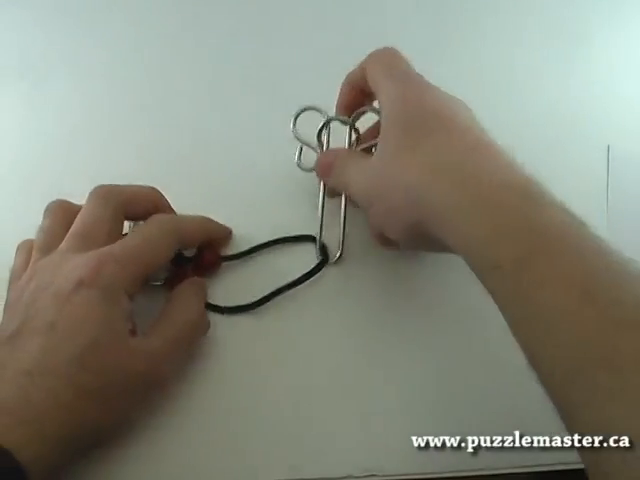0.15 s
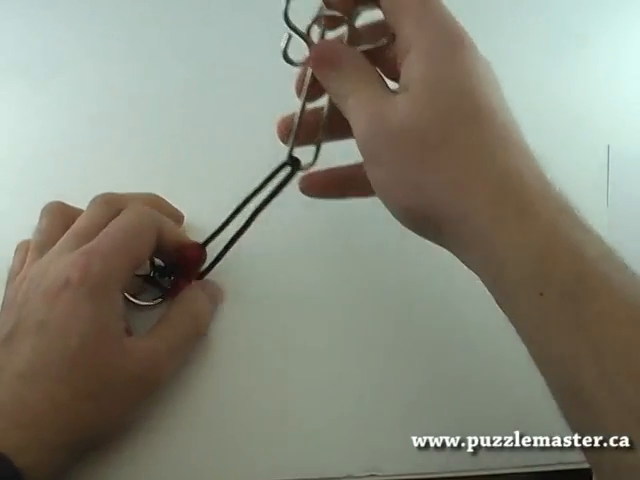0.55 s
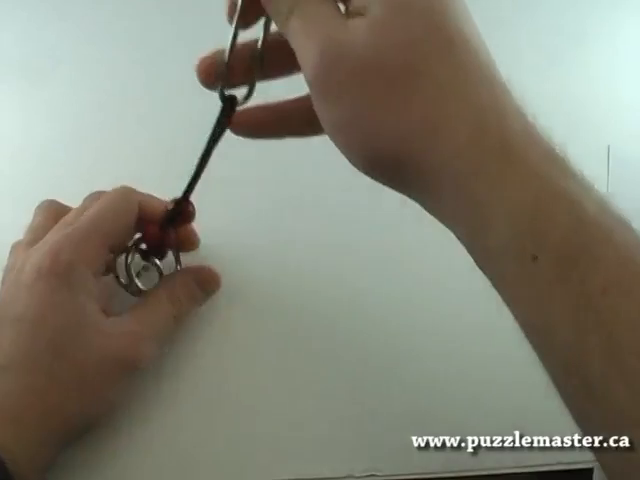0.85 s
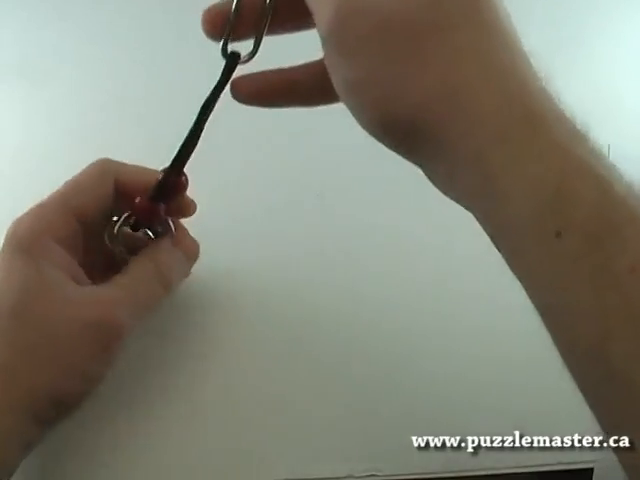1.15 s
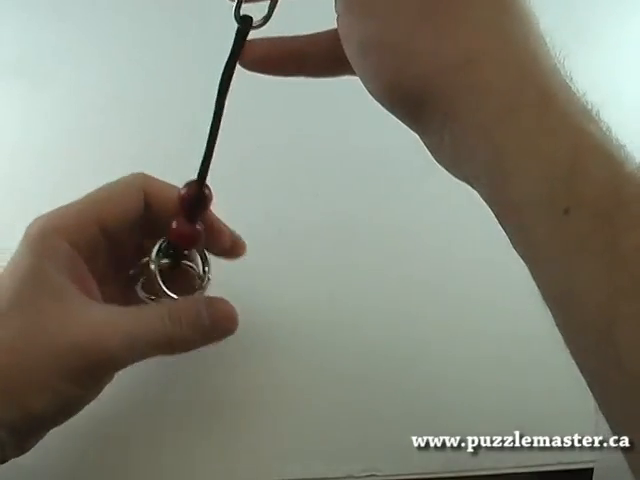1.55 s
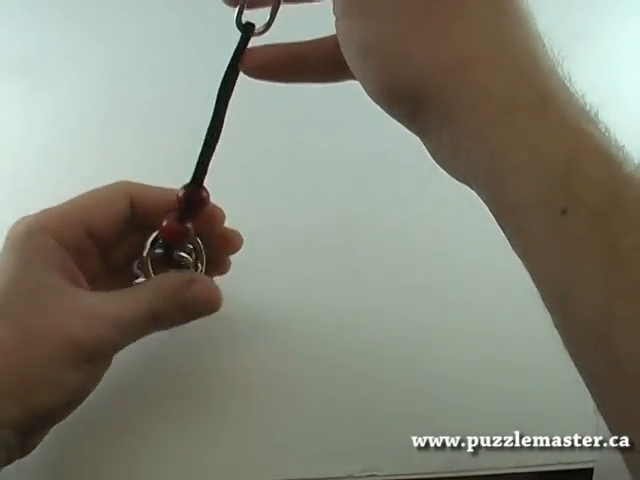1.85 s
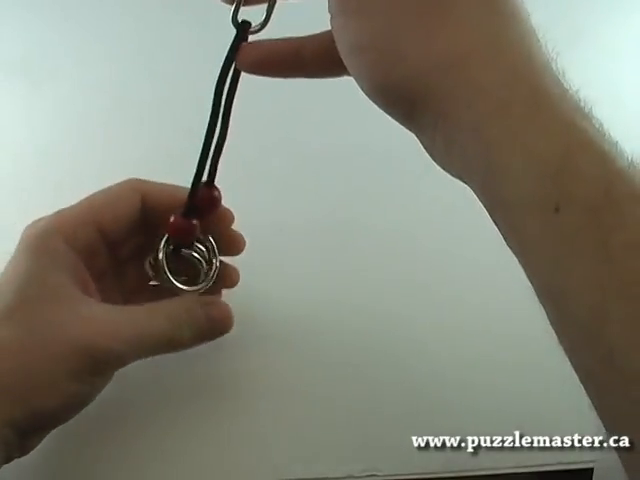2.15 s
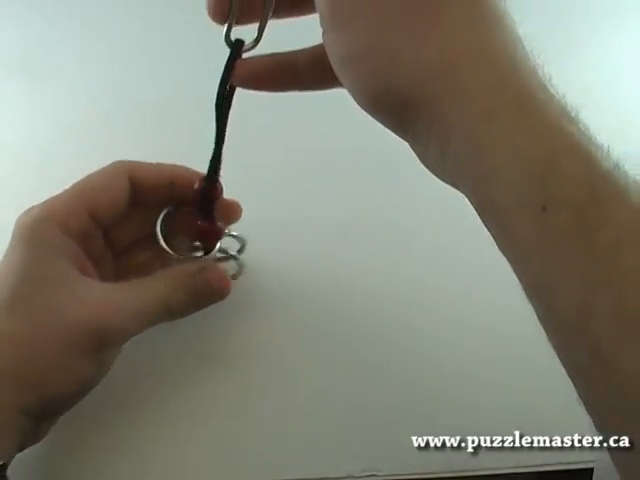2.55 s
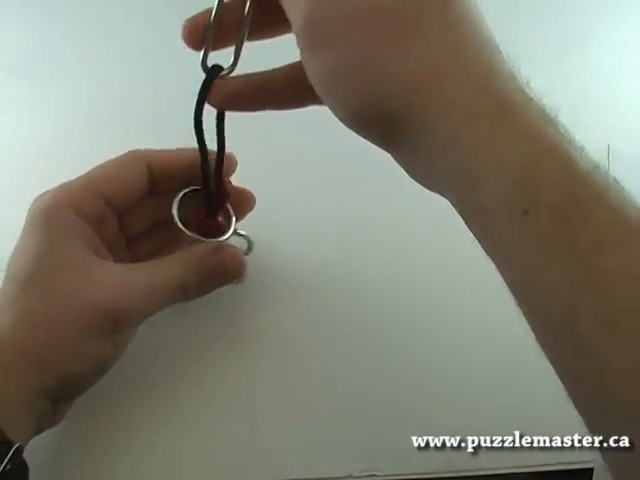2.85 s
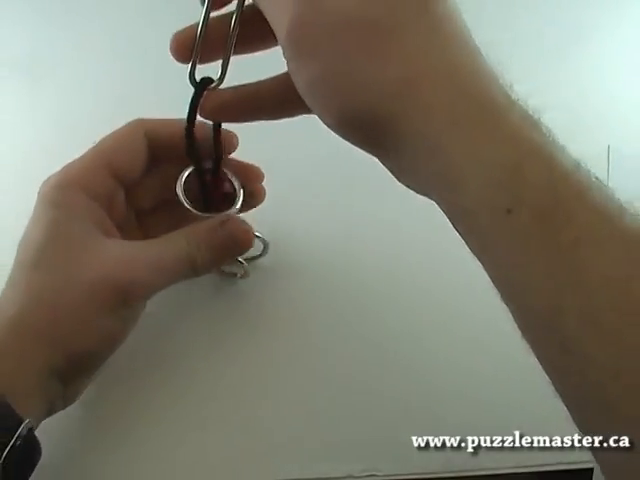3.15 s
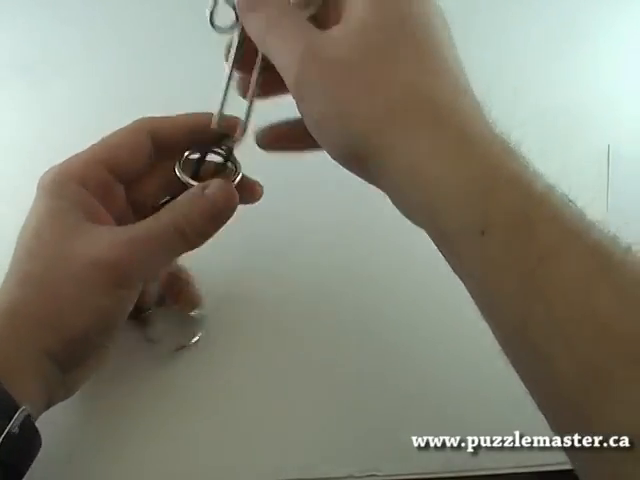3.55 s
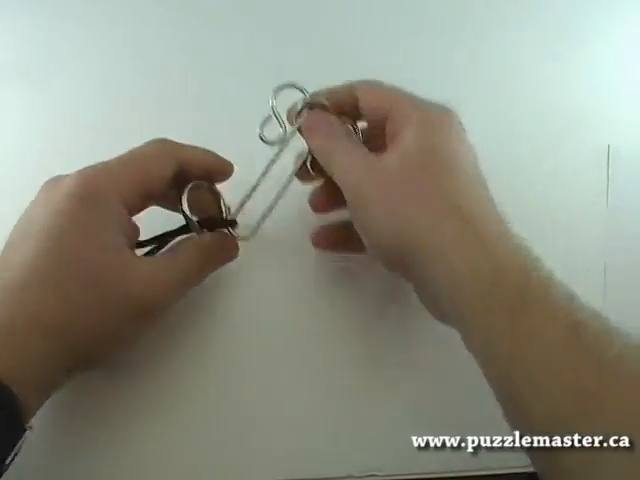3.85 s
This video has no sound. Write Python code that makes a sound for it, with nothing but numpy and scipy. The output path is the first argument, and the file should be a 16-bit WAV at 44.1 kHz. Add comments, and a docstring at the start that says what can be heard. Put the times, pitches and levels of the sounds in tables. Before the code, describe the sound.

Thin steel rings and a bent wire frame jingle, with sharp wooden bead clicks, close up indoors

```python
"""Wire puzzle lifted off a table

Hands lift a wire puzzle in a quiet room. Steel rings clink and a bent wire frame rattles: decaying modes plus
a noisy crack. Wooden beads click on their cord: struck resonances. Wire scrapes as random grains; cord and
fingers rub as shaped hiss; the table top rumbles under dragged parts as resonant noise. Mains gear hums as
steady tones over room tone, and a short room tail answers the hits."""
import sys
import numpy as np
from scipy import signal
from scipy.fft import rfft, irfft, next_fast_len
from scipy.io import wavfile
from scipy.ndimage import map_coordinates

SR = 44100
rng = np.random.default_rng(int(sys.argv[2]) if len(sys.argv) > 2 else 0)


def unload_audio(sound):
    """Save the sound as a 16-bit wav file, at the path given as the first command line argument."""
    columns = np.transpose(np.atleast_2d(sound))
    # keep every value between -1 and 1, then stretch to whole-number steps
    steps = np.round(np.clip(columns, -1, 1) * 32767)
    wavfile.write(sys.argv[1], SR, steps.astype(np.int16))


N = 176400


def amp(db):
    """Decibels to amplitude factor."""
    return 10 ** (np.asarray(db) / 20)


def unit(x):
    """Scale to rms 1."""
    return x / np.sqrt(np.mean(x ** 2) + 1e-20)


def along(points, hz):
    """Interpolate (Hz, value) points on a log frequency axis."""
    point_hz, value = np.transpose(points)
    return np.interp(np.log(hz + 1), np.log(point_hz + 1), value)


def curves(rows):
    """One value per sample for each column after the time."""
    s, *columns = np.transpose(rows)
    return [np.interp(np.arange(N) / SR, s, column) for column in columns]


def wobble(rate_hz):
    """Smooth random curve, rate_hz knots a second."""
    knots = rng.standard_normal(int(N * rate_hz / SR) + 4)
    return map_coordinates(knots, [np.arange(N) * rate_hz / SR])


def filtered(x, response):
    """Apply a complex frequency response to x."""
    size = next_fast_len(x.shape[-1] + 4096)
    spectrum = rfft(x, size) * response(np.fft.rfftfreq(size, 1 / SR))
    return irfft(spectrum, size)[..., :x.shape[-1]]


def resonances(rows):
    """Response of (Hz, width Hz, dB) resonances summed with alternating sign."""
    def response(f):
        total = 0
        for k, (centre, width, db) in enumerate(rows):
            band = 1j * f * width / (centre * centre - f * f + 1j * f * width)
            total = total + (-1) ** k * amp(db) * band
        return total
    return response


def stereo_noise(gain):
    """Coloured noise of rms 1, mixed from mid and side for a likeness that varies with frequency."""
    # left-right likeness: hz, correlation
    likeness = [(60, 0.76), (1000, 0.49), (4000, 0.72), (15000, 0.11)]

    def mid_side_gain(hz):
        turn = np.arccos(np.clip(along(likeness, hz), -1, 1)) / 2
        return gain(hz) * np.array([np.cos(turn), np.sin(turn)])

    mid, side = filtered(rng.standard_normal((2, N)), mid_side_gain)
    return unit(np.array([mid + side, mid - side]))


def add(out, start_s, peak_db, sound):
    """Lay in a stereo sound, its mono mix scaled to the given peak."""
    at = max(round(start_s * SR), 0)
    out[:, at:at + sound.shape[1]] += amp(peak_db) * sound / np.abs(sound.mean(0)).max()


def room_tone():
    """Steady coloured noise of the quiet room."""
    # room tone colour: hz, density_db (per Hz, relative)
    colour = [(20, -23), (40, -19.5), (90, -14), (200, -18), (420, -20), (900, -19), (2300, -27),
              (3200, -31), (7000, -35.5), (12000, -54), (16000, -38.5)]
    rms_db = -65
    return amp(rms_db) * stereo_noise(lambda hz: amp(along(colour, hz)))


def hum():
    """Mains tones of slowly wavering level; the two lowest beat."""
    # hum tones: pitch_hz, level_db (before trim)
    tones = [(114.6, -69.5), (120, -71), (240, -71.5), (2250, -79)]
    in_phase_s, trim_db = 2.77, 1.5
    t = np.arange(N) / SR - in_phase_s
    out = 0
    for hz, db in tones:
        out = out + amp(db + trim_db + 1.06 * wobble(3.7)) * np.cos(2 * np.pi * hz * t)
    return out


def rubbing():
    """Cord and fingers rub: grainy hiss with fast level flicker."""
    # rub strength: time_s, level_db (before trim)
    strength = [(0, -56), (.3, -57.5), (.5, -61), (.78, -66), (1.045, -68.5), (1.056, -59), (1.09, -65.5),
                (1.14, -57.5), (1.19, -58), (1.245, -50), (1.275, -69), (2.2, -72), (3.5, -68.5),
                (3.55, -80), (3.64, -60), (3.7, -60), (3.8, -55), (4, -66.5)]
    # rub colour: hz, density_db (per Hz, relative)
    colour = [(2500, -5.5), (3500, -10.5), (5200, -1.5), (7000, -1.5), (9000, -2), (11500, -2.5),
              (14000, -9.5), (16000, -16)]
    low_cut_hz, trim_db = 2500, 1.5
    db, = curves(strength)
    level = amp(db + trim_db + 0.5 * wobble(37) + wobble(300))
    return level * stereo_noise(lambda hz: amp(along(colour, hz)) * (hz > low_cut_hz))


def table_noise(modes):
    """Noise in the table's resonances, almost alike left and right."""
    pair = stereo_noise(lambda f: np.abs(resonances(modes)(f)) ** 2)
    return 0.78 * pair.mean(0) + 0.098 * pair


def dragging():
    """Lumpy dragging and decaying bumps drive noise in the table top's resonances."""
    # dragged parts: time_s, low_level_db, upper_level_db (before lumps)
    drag = [(0, -65.5, -53), (.3, -60, -60), (.75, -62, -73), (.94, -72, -95), (.99, -76, -80.5),
            (2.8, -81.5, -91), (3.1, -65.5, -70), (3.5, -61.5, -68), (3.66, -58.5, -62), (4, -64, -67)]
    # parts bumping the table: start_s, low_level_db, upper_level_db, t60_s
    bumps = [(0.026, -48.5, -55, 0.2), (0.056, -50, -44.5, 0.046), (0.126, -88, -53.5, 0.33),
             (0.17, -49, -33, 0.089), (0.221, -44, -43.5, 0.068), (0.264, -49.5, -44.5, 0.08),
             (0.451, -64, -57.5, 0.23), (0.549, -51.5, -80.5, 0.11), (0.71, -55.5, -58, 0.082),
             (0.806, -72, -55, 0.11), (0.846, -52, -65, 0.21), (0.897, -50.5, -84, 0.075),
             (3.183, -48.5, -59, 0.16), (3.536, -38.5, -56, 0.081), (3.558, -44.5, -82, 0.11),
             (3.58, -51.5, -81, 0.19)]
    # table resonances, response used squared: centre_hz, width_hz, level_db (both before squaring)
    low_modes = [(195, 103, -5.5), (265, 58, -1.5), (398, 142, -2.5)]
    upper_modes = [(782, 130, 14), (1000, 200, -38), (1417, 1140, 15), (3190, 2500, 6.5)]
    lump_rate_hz, lump_db, rise_s = 45, 2.25, 0.00044
    t = np.arange(N) / SR
    low, upper = amp(np.array(curves(drag)) + lump_db * wobble(lump_rate_hz))
    for s, low_db, upper_db, t60 in bumps:
        age = np.maximum(t - s, 0)
        shape = amp(-60 * age / t60) * (1 - np.exp(-age / rise_s))
        low = low + amp(low_db) * shape
        upper = upper + amp(upper_db) * shape
    return low * table_noise(low_modes) + upper * table_noise(upper_modes)


def scraping():
    """Wire slides on wire: irregular tiny contacts excite broad resonances."""
    # slides: start_s, end_s, first_level_db, last_level_db
    slides = [(0.156, 0.289, -52, -46), (.828, 0.979, -42.5, -59), (3.53, 3.712, -55.5, -57)]
    # wire resonances, response used squared: centre_hz, width_hz, level_db (both before squaring)
    body = [(1534, 1060, -4.5), (5100, 1500, 1.5), (10000, 2600, 1)]
    grains_per_s, size_scatter_db, ramp_s = 5000, 2.5, 0.0071
    t = np.arange(N) / SR
    contact = rng.random(N) < grains_per_s / SR
    size = amp(size_scatter_db * rng.exponential(size=N))
    grains = contact * size * np.sign(rng.standard_normal(N))
    sound = unit(filtered(grains, lambda f: resonances(body)(f) ** 2 / (1 + (f / 12000) ** 8)))
    shape = 0
    for start, end, first_db, last_db in slides:
        ramps = np.clip(np.minimum(t - start, end - t) / ramp_s, 0, 1)
        shape = shape + amp(np.interp(t, [start, end], [first_db, last_db])) * ramps
    return shape * amp(2.5 * wobble(60)) * sound


def beads():
    """Wooden beads: an impulse and a quick noisy rattle strike a broad resonance and a lower knock."""
    # bead clicks: start_s, peak_db, centre_hz, tail_db
    hits = [(.028, -31, 5400, -16), (0.126, -28.5, 5250, -7), (0.177, -30, 4960, -11),
            (0.8066, -4.5, 7530, -14.5), (0.8227, -14, 6800, -14), (0.8305, -19, 6300, -19),
            (0.889, -27.5, 5900, -5.5), (1.6, -32, 6250, -16), (2.596, -45.5, 4300, -18),
            (2.6402, -20, 5100, -11), (2.654, -37.5, 3900, -9), (2.783, -37.5, 4540, -20),
            (2.917, -48, 2740, -12), (2.9553, -11, 5970, -19.5), (2.9742, -20.5, 5830, -44),
            (3.181, -42.5, 5300, -2), (3.2991, -10, 6540, -15), (3.3182, -37, 1940, -14),
            (3.41, -49.5, 1730, 3), (3.789, -30, 4550, -8.5)]
    body_q, tail_t60_s, grain_power = 1.73, 0.042, 0.88
    knock_hz, knock_width_hz, knock_db = 1194, 600, -4
    knock_db_per_oct = 15  # brighter clicks carry less knock
    out, t = np.zeros((2, N + SR)), np.arange(SR // 8) / SR
    for s, db, hz, tail_db in hits:
        noise = rng.standard_normal(len(t)) + 0.2 * rng.standard_normal((2, len(t)))
        grain = np.abs(rng.standard_normal(len(t))) ** grain_power
        rise = np.minimum(t / tail_t60_s * 20, 1)
        blow = amp(tail_db - 60 * t / tail_t60_s) * noise * grain * rise / 2
        blow[:, 0] = 1  # the click itself
        this_knock_db = knock_db - knock_db_per_oct * np.log2(max(hz, 3500) / 4500)
        body = resonances([(hz, hz / body_q, 0), (knock_hz, knock_width_hz, this_knock_db)])
        add(out, s, db, filtered(blow, lambda f: body(f) ** 2 / (1 + (f / 9500) ** 6)))
    return out[:, :N]


def clink_modes(t, modes, pitch_hz, factor, hard_db, spread_oct, floor_db, pan_db):
    """Stereo sum of decaying modes, strongest near pitch_hz, blurred by loose contact."""
    low_hz, low_db_per_hard_db = 6000, 1.16  # hard blows wake the low modes
    jolt_db, jolt_db_per_hard_db, jolt_t60_s = 5, 0.97, 0.012  # extra level that dies at once
    buzz, buzz_hz = 0.6, 450  # random blur of each mode: depth (halved for low modes), knots a second
    pan_scatter_db, level_scatter_db, rise_s = 1.5, 2, 0.00091
    phase_scatter_rad = 1.3  # left-right, at 12 kHz
    hz, level_db, t60 = np.transpose(modes)[:, :, None]
    # modes fall 6 dB at spread_oct from the pitch, floor_db at most
    near_db = np.maximum(-6 * (np.log2(hz / pitch_hz) / spread_oct) ** 2, floor_db)
    near_db = near_db + low_db_per_hard_db * hard_db * (hz < low_hz)

    knot_count = SR // 100
    knots = rng.standard_normal((2, len(hz), knot_count))
    real, imag = [np.array([np.interp(t * buzz_hz, np.arange(knot_count), k) for k in part])
                  for part in knots]
    depth = buzz * np.where(hz < low_hz, 0.5, 1)
    wave = (1 + depth * (real + 1j * imag)) * np.exp(2j * np.pi * hz * t)

    jolt = amp(jolt_db + jolt_db_per_hard_db * hard_db + near_db - 60 * t / jolt_t60_s)
    fade = amp(-60 * t / (t60 * factor)) + (hz > low_hz) * jolt
    level = amp(level_db + near_db + level_scatter_db * rng.standard_normal(hz.shape))
    tones = level * fade * wave * (1 - np.exp(-t / rise_s))

    side_db = pan_db / 2 + pan_scatter_db * rng.standard_normal(hz.shape) / 2
    phase = 0.5 * phase_scatter_rad * (hz / 12000) ** 2 * rng.standard_normal(hz.shape)
    left = amp(side_db) * np.exp(1j * phase)
    return np.array([(tones * left).sum(0).imag, (tones / left).sum(0).imag])


def clinks(hits, modes, spread_oct, floor_db, crack_hz, crack_width_hz, pan_db):
    """Each metal contact chatters briefly, rings modes near its pitch and cracks; pan_db is left minus right."""
    crack_t60_s, chatter_s, hard_from_db = 0.025, 0.0087, -22
    crack_body = resonances([(crack_hz, crack_width_hz, 0)])
    out, t = np.zeros((2, N + SR)), np.arange(SR // 5) / SR
    for s, db, pitch_hz, crack_db, factor in hits:
        hard_db = max(db - hard_from_db, 0)
        ring = clink_modes(t, modes, pitch_hz, factor, hard_db, spread_oct, floor_db, pan_db)
        hiss = rng.standard_normal(len(t)) + 0.15 * rng.standard_normal((2, len(t)))
        crack = unit(filtered(hiss, lambda f: crack_body(f) ** 2 / (1 + (f / 12500) ** 6)))
        crack = crack * amp(crack_db - 60 * t / crack_t60_s) * amp([[pan_db / 2], [-pan_db / 2]])
        sound = ring + crack * np.abs(ring).max() / 2
        # one full touch, then three weaker ones at random
        touches, later = np.zeros(SR // 8), rng.random((3, 2))
        touches[0] = 1
        touches[1 + (later[:, 0] * chatter_s * SR).astype(int)] = 0.15 + 0.35 * later[:, 1]
        add(out, s, db, signal.fftconvolve(sound, touches[None], axes=1))
    return out[:, :N]


def frame_clinks():
    """Bent wire frame: modes spread over a wide band around each pitch."""
    # frame contacts: start_s, peak_db, pitch_hz, crack_db (re half the ring peak), ring_time_factor
    hits = [(0.038, -28.5, 11300, 2, 0.89), (0.0565, -21, 10800, -5, 0.56),
            (0.1659, -27.5, 8700, -1.5, 0.49), (0.172, -20, 8070, -1.5, 1), (0.1964, -30, 8900, -8, 1),
            (0.2221, -25, 8500, 1, 0.96), (0.2599, -19.5, 8400, -11, 0.7),
            (0.2697, -15.5, 9700, -13.5, 0.53), (0.2784, -21, 8730, 0, 0.3), (0.33, -31.5, 8690, 5, 0.23),
            (0.3719, -31, 9400, -1.5, 0.21), (0.4528, -38.5, 7810, 8, 0.25),
            (3.5982, -27, 10570, -3.5, 0.22), (3.7204, -32.5, 9900, -34, 0.96),
            (3.7344, -36.5, 8650, -3.5, 0.7), (3.76, -25.5, 10200, -21, 0.71), (3.7738, -4, 10250, -18, 1),
            (3.8088, -28.5, 10300, -3, 1), (3.8641, -25.5, 8650, -8.5, 0.42), (3.8924, -38, 8300, -7, 0.32),
            (3.9842, -26.5, 8900, -6, 0.61)]
    # frame modes: pitch_hz, level_db, t60_s (before ring_time_factor)
    modes = [(5642, -17, .17), (7110, -15, .045), (8000, -3, .16), (8300, -6, .09), (8720, -1, .1),
             (10200, -1, .07), (10500, 1, .09), (10750, -3, .11), (11030, -9, .057), (11940, -12, .04),
             (12850, -2, .07), (14300, -7, .05), (15300, -6, .06)]
    return clinks(hits, modes, spread_oct=0.36, floor_db=-11.5,
                  crack_hz=11340, crack_width_hz=20500, pan_db=0)


def ring_clinks():
    """Steel rings: modes in a narrow band around each pitch stand out."""
    # ring contacts: start_s, peak_db, pitch_hz, crack_db (re half the ring peak), ring_time_factor
    hits = [(0.5496, -23.5, 9300, -6.5, 0.44), (0.625, -28, 9600, -5, 0.48),
            (0.7078, -26.5, 9660, -4.5, 0.35), (0.8895, -20, 9250, -11, 0.48),
            (0.8908, -21.5, 10360, -2.5, 0.31), (1.1356, -42.5, 9700, 0, 1), (1.3892, -48, 9340, -7, 0.8),
            (1.411, -44.5, 9500, -8, 0.48), (1.472, -33, 8400, -10, 0.3), (1.503, -43, 10100, 4, 0.3),
            (1.6215, -33.5, 9560, 2.5, 0.58), (1.7068, -35.5, 9500, 5, 0.23),
            (1.8333, -24.5, 10330, -7.5, 0.55), (1.8564, -33.5, 10150, 6, 0.67),
            (1.8795, -32, 9300, -16, 0.38), (1.984, -42, 9030, -13, 0.27), (2.0362, -26, 9000, -14, 0.43),
            (2.0617, -30, 8560, -7.5, 0.71), (2.0792, -26.5, 9900, -9, 0.42), (2.382, -40, 8850, -13, 0.27),
            (2.43, -37.5, 9590, -3.5, 0.81), (2.5021, -24, 11500, -19, 0.54),
            (2.5274, -33.5, 9300, -15, 0.89), (2.6411, -27.5, 9930, -32, 0.48),
            (2.8372, -32, 8960, -16, 0.5), (2.9093, -32.5, 9100, -7.5, 0.3),
            (2.9557, -21.5, 10040, -11, 0.45), (3.408, -30, 9220, -11.5, 0.59),
            (3.5339, -22, 8970, -8, 0.75), (3.5452, -27, 9000, -17, 0.47), (3.5724, -27, 9200, -11, 0.44),
            (3.5853, -37, 8800, -18, 0.47), (3.6323, -34.5, 9060, -32, 0.24)]
    # ring modes: pitch_hz, level_db, t60_s (before ring_time_factor)
    modes = [(6360, -17, 0.044), (8870, 3.5, 0.12), (9240, -0.5, 0.14), (9370, -4.5, 0.058),
             (9440, -13, 0.13), (9800, -9.5, 0.057), (10060, 1, .15), (10580, -8, 0.06), (10610, 1, 0.2),
             (10830, -7.5, 0.12), (13300, -12, 0.036)]
    return clinks(hits, modes, spread_oct=0.062, floor_db=-16.5,
                  crack_hz=9300, crack_width_hz=11100, pan_db=-1.5)


def room(x):
    """Short noise tail, each frequency dying at its own speed."""
    # room decay: hz, t60_s
    decay = [(500, 0.43), (5000, 0.1), (14000, 0.035)]
    delay_samples = 130
    hz, t, bins = signal.stft(rng.standard_normal((2, SR // 3)), SR, nperseg=256)
    fade = amp(-60 * t / along(decay, hz)[:, None])
    tail = signal.istft(bins * fade, SR, nperseg=256)[1]
    tail = 2.1 * tail[:1] + 0.17 * tail  # mostly shared by left and right
    tail = tail / np.linalg.norm(tail[0])
    delayed = np.pad(x.mean(0), (delay_samples, 0))
    return signal.fftconvolve(delayed[None], tail, axes=1)[:, :N]


def scene():
    """All sources; hits and scrapes get the room's answer."""
    room_db = -13.5
    background = room_tone() + hum() + rubbing() + dragging()
    hits = scraping() + beads() + frame_clinks() + ring_clinks()
    return background + hits + amp(room_db) * room(hits)


def record(dry):
    """The top of the band is weakened, then cut."""
    top_hz, above_db, end_hz = 15400, -18, 16800
    return filtered(dry, lambda hz: np.where(hz < top_hz, 1, amp(above_db)) * (hz < end_hz))


dry = scene()
out = record(dry)
unload_audio(out)
```